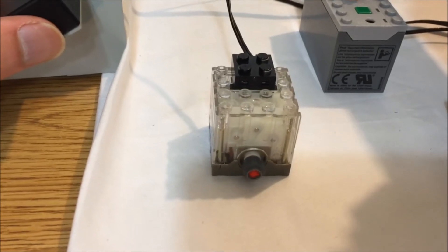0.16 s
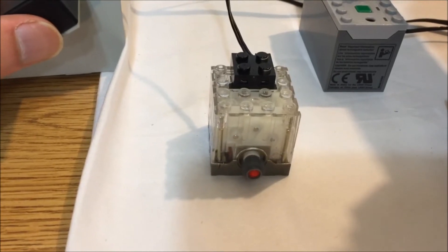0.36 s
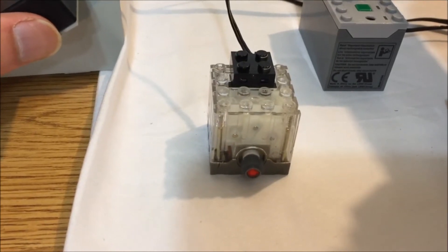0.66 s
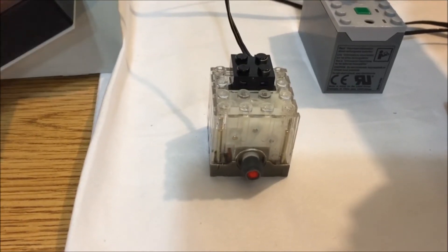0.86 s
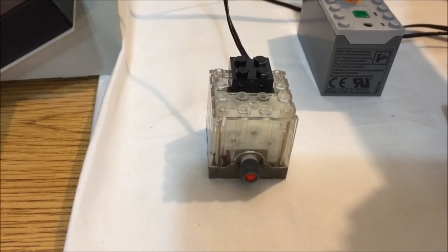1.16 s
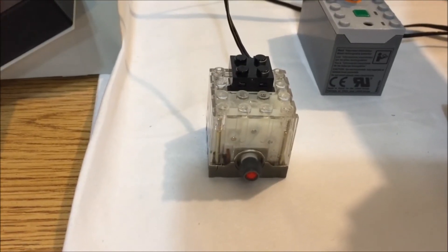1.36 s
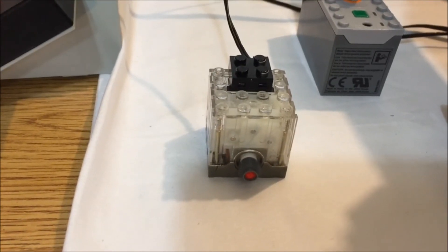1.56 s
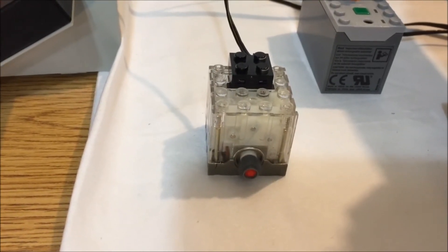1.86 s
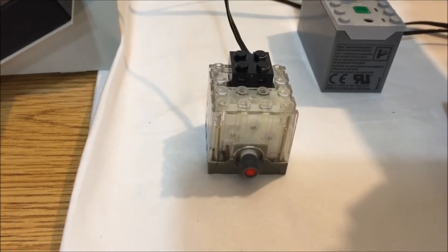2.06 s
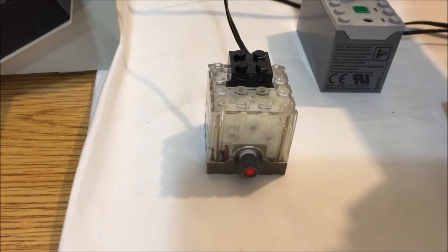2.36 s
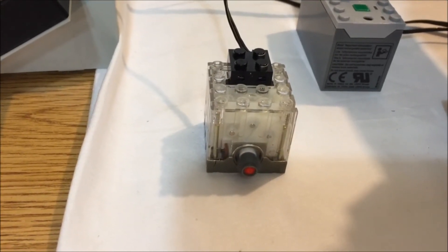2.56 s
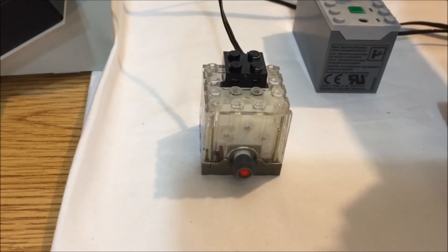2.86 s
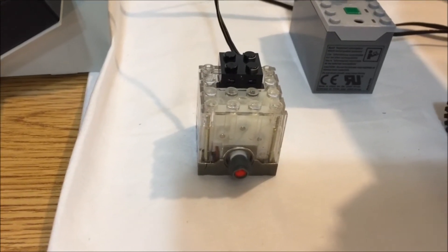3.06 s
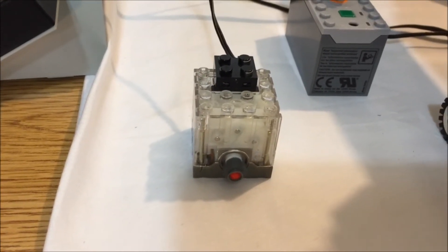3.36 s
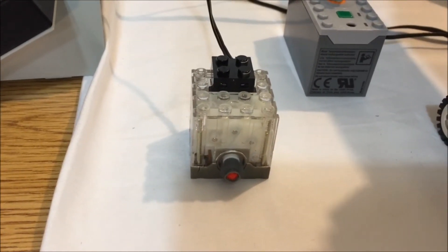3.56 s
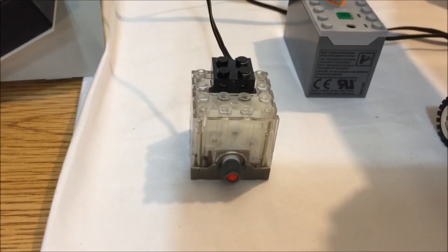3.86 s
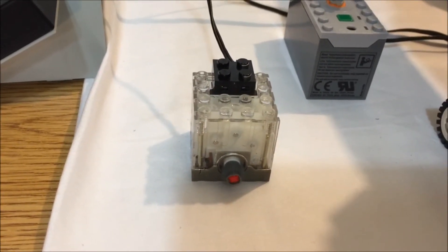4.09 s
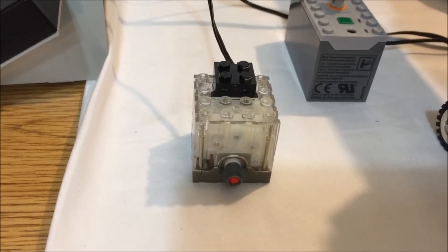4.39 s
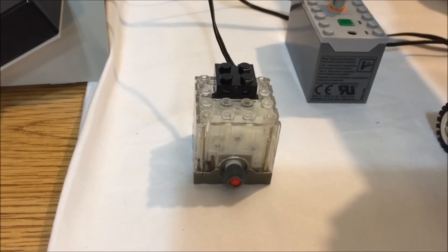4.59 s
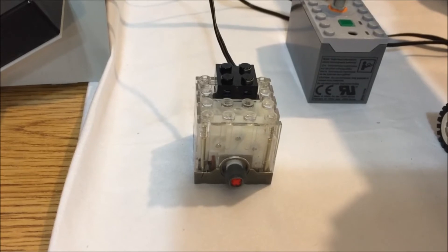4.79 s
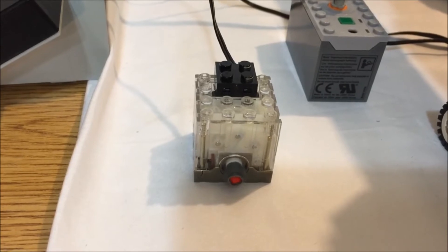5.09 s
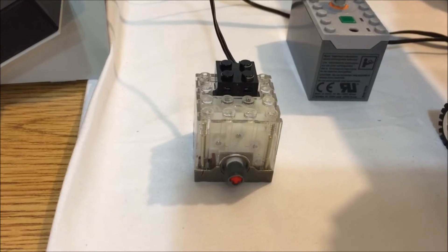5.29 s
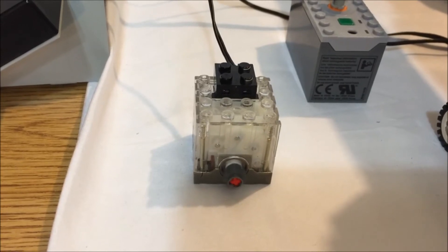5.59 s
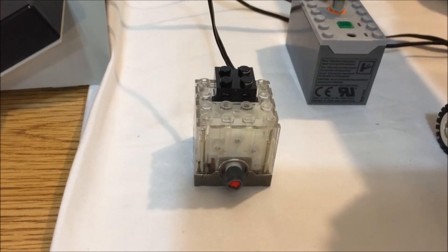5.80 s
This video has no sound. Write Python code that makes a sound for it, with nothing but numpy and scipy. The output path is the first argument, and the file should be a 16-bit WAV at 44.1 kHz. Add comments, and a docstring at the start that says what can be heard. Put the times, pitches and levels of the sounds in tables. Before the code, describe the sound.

A small geared electric motor buzzes steadily up close, rattles briefly on paper, then drops in pitch and loudness in steps.

```python
"""Geared toy motor on a papered table

Armature knocks, three a shaft turn, excite the modes of a plastic case and pass into the table top.
The case sits firmly, shakes loose with bouts of chatter on the paper, then settles; dial clicks slow the motor.
Gear teeth add shaped noise and the magnetic pull a tonal hum, both following the speed. Decaying
box modes make the dial's thuds; low noise makes the room's rumble, over faint still air."""
import sys
import numpy as np
from scipy import signal
from scipy.fft import rfft, irfft, next_fast_len
from scipy.io import wavfile
from scipy.ndimage import uniform_filter1d, map_coordinates

SR = 44100
rng = np.random.default_rng(int(sys.argv[2]) if len(sys.argv) > 2 else 0)


def transcribe(signal):
    """Save signal, clipped to [-1, 1], as a 16-bit WAV file at the path in sys.argv[1]."""
    frames = np.atleast_2d(signal).T
    limited = np.clip(frames, -1, 1)
    pcm = np.round(limited * 32767).astype(np.int16)
    wavfile.write(sys.argv[1], SR, pcm)


def ratio(d):
    """dB to gain"""
    e = np.asarray(d, float) / 20
    return 10 ** e


N = 261954  # samples

# dial settings: start_s, rate_knocks_per_s
DIAL_STEPS = [(0, 174.3), (3.002, 152.15), (3.96, 127.55), (5.2, 103.2), (5.504, 79.4)]
COAST_S = .066  # time constant of the armature slowing towards a new setting
# wavering of the top speed: time_s, offset_knocks_per_s
SPEED_WAVER = [(0, .1), (.85, -.37), (1.5, .4), (1.7, -.35), (2.05, 0), (2.3, 0), (2.6, .75), (3, .9),
               (3.3, 0)]
# how the case sits, first firm, then shaking, then settled: time_s, firm_0_to_1, shaking_0_to_1
CASE_SEAT = [(0, 1, 0), (1.64, 1, 0), (1.72, 0, .6), (2.3, 0, 1), (2.46, 0, 0)]
# level changes while firm and while shaking: knock_db, frame_ring_db, hardness_db, gear_hiss_db, hum_db
FIRM_CHANGES = (5, -0.06, -3.5, 0, -.4)
SHAKING_CHANGES = (-6, -4, 0.8, 1.5, 7.5)
# the same for the table modes: low_db, middle_db, upper_db
FIRM_TABLE_CHANGES = (-34, 5, -10)
SHAKING_TABLE_CHANGES = (-10, -2, 5.5)
FIRM_TIGHT, SHAKING_LOOSE = .4, 0.63  # share of looseness lost while firm; looseness added by shaking
FIRM_SHELL_DB = 2.5  # gain of the shell's upper mode while firm
FIRM_TOP_DB = 6.5  # gain of the top treble until the case has settled
EVEN_POLES = 0.29  # how far the poles even out before the case settles, 0-1

# knock strength by speed: rate_knocks_per_s, first_pole_relative_db, frame_ring_db, hardness_db
KNOCK_LEVELS = [(78, -51.5, 3.5, 1.5), (108, -50.5, 4.5, 5), (131.1, -40, 1, 1.5), (156.5, -36.5, -2.5, 1),
                (178, -35.5, -2, 0.5)]
# play and tooth noise by speed: rate_knocks_per_s, looseness_0_to_1, hiss_db
GEAR_PLAY = [(79, 0.31, -59), (103, .27, -56), (129, 0.2, -49.5), (153.5, 0.15, -44.5), (185, .13, -40.5)]
# the other poles against the first: rate_knocks_per_s, second_db, third_db, second_late_ms, third_late_ms
POLE_OFFSETS = [(107, -1, -2, 0, 0), (127.5, -4, -7.5, .04, .06), (152, -4, -8, .07, .16),
                (174.5, -2, -4.5, .05, .09)]
# tick ahead of each knock as the teeth take up their slack: rate_knocks_per_s, early_ms, relative_db
SLACK_TICKS = [(80, 3, -3), (104, 2.2, -5), (127.5, 1.4, -6), (152, 1.2, -6), (174.5, .6, -14)]
# longer skips, the teeth barely touching while the case is firm: start_s, length_s
TOOTH_SKIPS = [(.107, .012), (.165, .023), (.337, .017), (.595, .024), (.682, .023), (.9, .063),
               (1.078, .006), (1.279, .012), (1.348, .023), (1.416, .012), (1.571, .023)]
SKIP_SHARE, STRAY_SKIP_SHARE = .8, .09  # share of knocks missed inside these and otherwise, while firm
# case modes: centre_hz, width_hz, relative_db, delay_ms
CASE_MODES = [(1892, 166, -5.5, 0.098), (2070, 270, -1.5, 0.097), (2514, 283, 2.5, 0.0987),
              (3186, 384, -4, 0.109), (3476, 600, -5.5, 0.133), (4526, 590, -4, 1.104),
              (5310, 1760, -10, 1.112), (6660, 1650, -1, 0), (8970, 500, -9, 0), (10860, 1300, -16.5, 0.12),
              (13500, 450, -19, 0), (16500, 1400, -21, 0.1)]
# anti-resonances of the motor: centre_hz, width_hz, depth_0_to_1
ANTI_RESONANCES = [(904, 35, 1), (1846, 29, 0.34), (5400, 210, 0.75), (14200, 400, .6)]

# table-top modes: centre_hz, width_hz, chatter_per_looseness, pole_contrast_0_to_1
TABLE_MODES = [(820, 100, 0, .6), (1200, 330, .6, .2), (1560, 300, 1.1, .2)]
# what the table top takes up by speed: rate_knocks_per_s, low_db, middle_db, upper_db
TABLE_LEVELS = [(81, -77, -89, -70), (87, -68, -91, -64), (109.4, -68, -81, -68), (112, -63, -77, -64),
                (128, -67.5, -73.5, -59), (144, -68, -60, -57), (153.6, -66.5, -62.5, -63),
                (168, -76, -57.5, -60.5)]
# buzz in the lowest table mode: rate_knocks_per_s, share_0_to_1
TABLE_BUZZ = [(80, .15), (104, .04), (127.5, .5), (152, .93), (174.5, .3)]

# spectrum shape of the tooth hiss: frequency_hz, density_db_per_hz
HISS_SPECTRUM = [(700, -73), (1150, -27), (1450, -11), (1800, -8.5), (2500, -6), (3600, -4), (4700, -1.5),
                 (5400, -4), (6800, -5.5), (11000, -12.5), (15700, -21), (16000, -74)]
# spectrum shape of the lower gear noise: frequency_hz, density_db_per_hz
WHIRR_SPECTRUM = [(400, -38), (600, -18.5), (760, -32), (950, -10), (1300, -6.5), (1600, -30), (2000, -80)]
WHIRR_DB, WHIRR_DB_PER_OCTAVE = -19.5, 16  # against the hiss at top speed; falls with speed
# hum partials by speed: rate_knocks_per_s, fourth_multiple_db, fifth_multiple_db
HUM_LEVELS = [(104, -105, -100), (127.5, -94, -84), (145, -80, -100), (152, -76, -100), (174.5, -67, -100)]

# spectrum shape of the room rumble: frequency_hz, density_db_per_hz
RUMBLE_SPECTRUM = [(13, -43), (22, -21), (65, 1.5), (97, -9), (124, -0.5), (157, -10.5), (200, -19),
                   (300, -120)]
# underlying rumble level: time_s, level_db
RUMBLE_LEVEL = [(0, -72), (3, -74), (4.3, -73.5), (5.94, -77.5)]
# swells of the rumble: start_s, rise_db, dying_s
RUMBLE_SWELLS = [(.87, 22, 0.047), (1.25, 10.5, 0.26), (1.77, 24, 0.02), (3.25, 9.5, 0.17),
                 (3.76, 13, 0.053), (4.25, 14, 0.05), (5.8, 10, 0.051)]
# spectrum shape of still air: frequency_hz, density_db_per_hz
AIR_SPECTRUM = [(120, -60), (190, 0), (262, -1), (419, -10), (600, -11), (800, -40), (1000, -100)]
AIR_DB = -81

# fingertip thuds: start_s, relative_db, upper_modes_db
DIAL_THUDS = [(0.889, -41.5, 13), (0.999, -52.5, 2), (3.034, -66, 3), (3.183, -57.5, 0), (3.405, -50, 4),
              (3.492, -63, -2), (4.852, -66, 0), (5.148, -68, 3), (5.479, -65, 3), (5.853, -70, 0)]
# modes of the dial box: frequency_hz, relative_db, t60_s
DIAL_BOX_MODES = [(187, 4.5, 0.015), (333, 4.5, 0.022), (428, -3.5, 0.031), (703, 12.5, 0.0061),
                  (882, 0, 0.015), (1173, -4.5, 0.016), (1460, -5.5, 0.017)]

# bouts of chatter on the paper: start_s, length_s, level_db, shell_thump_db
RATTLE_BOUTS = [(1.685, 0.058, -57, 5.5), (1.833, 0.043, -53, 8), (1.957, 0.0067, -55, 4.5),
                (2.027, 0.0067, -64, 3.5), (2.117, 0.079, -51, 4.5), (2.24, 0.048, -58.5, 2.5)]
RATTLE_RISE_DB_PER_S, RATTLE_FALL_DB_PER_S, RATTLE_HARDENS_DB = 601, 358, 6
RATTLE_REST_DB = -62  # between bouts while the case shakes


def unit(x):
    """Normalisation: a signal is scaled to rms 1."""
    return x / np.sqrt(np.mean(x ** 2) + 1e-20)


def steady(x):
    """Level equalisation: division by the running rms removes slow drifts."""
    return x / np.sqrt(np.abs(uniform_filter1d(x ** 2, size=SR // 2)) + 1e-12)


def curves(rows):
    """Linear interpolation in time: each column after the first at every sample."""
    s, *cols = np.transpose(rows)
    return [np.interp(np.arange(N) / SR, s, c) for c in cols]


def by_speed(rows, speed):
    """Linear interpolation in speed: each column after the first at the given speeds."""
    key, *cols = np.transpose(rows)
    return np.array([np.interp(speed, key, c) for c in cols])


def filtered(x, response):
    """Linear filtering: the spectrum is multiplied by a complex frequency response."""
    m = next_fast_len(N + SR // 4)
    return irfft(rfft(x, m) * response(np.fft.rfftfreq(m, 1 / SR)), m)[:N]


def coloured(points):
    """Spectral shaping: white noise takes on the given spectrum at rms 1."""
    f, db = np.transpose(points)

    def response(hz):
        return ratio(np.interp(np.log(hz + 1), np.log(f + 1), db))
    return unit(filtered(rng.standard_normal(N), response))


def mode(f, hz, width):
    """Simple resonance: the causal response of one damped oscillator."""
    return 1j * f * width / (hz * hz - f * f + 1j * f * width)


def pulses(at, size):
    """Band-limited impulses: windowed sincs allow positions between samples."""
    taps = np.floor(at)[:, None] + np.arange(-7, 9)
    offset = taps - at[:, None]
    shape = np.sinc(offset) * np.cos(np.pi * offset / 16) ** 2
    places = np.clip(taps, 0, N - 1).astype(int)
    return np.bincount(places.ravel(), (size[:, None] * shape).ravel(), N)


def clicks(at, size, share, chatter_s):
    """Impact excitation: clean clicks give a share of their energy to a short chatter of teeth."""
    t = np.arange(SR // 100) / SR
    burst = (1 - np.exp(-t / .0001)) * np.exp(-t / chatter_s)
    burst /= np.linalg.norm(burst)
    gate = signal.fftconvolve(pulses(at, size * np.sqrt(share)), burst)[:N]
    return pulses(at, size * np.sqrt(1 - share)) + gate * rng.standard_normal(N)


def armature():
    """Rotational inertia: after each dial click the knock rate coasts exponentially to its setting."""
    t = np.arange(N) / SR
    speed = DIAL_STEPS[0][1] + curves(SPEED_WAVER)[0]
    for (_, old), (s, new) in zip(DIAL_STEPS, DIAL_STEPS[1:]):
        speed += (new - old) * (1 - np.exp(-np.maximum(t - s, 0) / COAST_S))
    return speed


def seated(firm_db, shaking_db):
    """Contact coupling: level changes follow how the case sits."""
    firm, shaking = curves(CASE_SEAT)
    return np.outer(firm_db, firm) + np.outer(shaking_db, shaking)


def bouts():
    """Intermittent contact: chatter gain, bout strength 0-1 and shell thump in dB."""
    t = np.arange(N) / SR
    under_db = []
    for s, length, _, _ in RATTLE_BOUTS:
        before_db = RATTLE_RISE_DB_PER_S * np.maximum(s - t, 0)
        after_db = RATTLE_FALL_DB_PER_S * np.maximum(t - s - length, 0)
        under_db.append(before_db + after_db)
    strength = ratio(-np.array(under_db))
    _, _, db, thump_db = np.transpose(RATTLE_BOUTS)
    rest = ratio(RATTLE_REST_DB) * np.minimum(2 * curves(CASE_SEAT)[1], 1)
    return ratio(db) @ strength + rest, strength.max(axis=0), thump_db @ strength


def knock_train(phase, speed, jitter_s):
    """Periodic impact: three poles a shaft turn, shifted by the play in the bearings."""
    count = np.arange(1, int(phase[-1]) + 1)
    even = np.interp(count, phase, np.arange(N))  # sample positions before shifting
    i, pole = even.astype(int), count % 3
    firm, shaking = [c[i] for c in curves(CASE_SEAT)]
    unmoved = np.clip(firm + 2 * shaking, 0, 1)
    draw = rng.standard_normal((len(count), 3 + len(CASE_MODES)))

    loose = by_speed(GEAR_PLAY, speed[i])[0] * (1 - FIRM_TIGHT * firm) + SHAKING_LOOSE * shaking
    loose = np.clip(loose * np.array([.5, 1.2, 1.6])[pole], 0, 1)  # the first pole seats firmly

    offsets = by_speed(POLE_OFFSETS, speed[i]) * (1 - EVEN_POLES * unmoved)
    second_db, third_db, second_ms, third_ms = offsets
    pole_db = np.choose(pole, [0 * i, second_db, third_db])
    late_ms = np.choose(pole, [0 * i, second_ms, third_ms])
    at = even + late_ms * SR / 1000 + jitter_s * SR * loose * draw[:, 1]

    skipping = sum((even > s * SR) & (even < (s + length) * SR) for s, length in TOOTH_SKIPS)
    chance = firm * np.where(skipping, SKIP_SHARE, STRAY_SKIP_SHARE)
    missed = rng.random(len(count)) < chance  # the teeth barely touch
    return dict(even=even, at=at, i=i, speed=speed[i], firm=firm, unmoved=unmoved,
                loose=loose, pole_db=pole_db, missed=missed, draw=draw)


def case_ring(train, scatter_db, colour_db, miss_db):
    """Modal excitation: each knock and its early slack tick ring the modes of the plastic case."""
    at, i, speed, loose, draw = [train[key] for key in ("at", "i", "speed", "loose", "draw")]
    _, bout, thump_db = [c[i] for c in bouts()]
    seat_db = seated(FIRM_CHANGES, SHAKING_CHANGES)[:3, i]
    first_db, frame_db, hard_db = by_speed(KNOCK_LEVELS, speed) + seat_db
    first_db += thump_db
    frame_db += RATTLE_HARDENS_DB * bout - thump_db
    hard_db += RATTLE_HARDENS_DB * bout - thump_db
    lead_ms, lead_db = by_speed(SLACK_TICKS, speed)
    slow_octaves = np.log2(speed / 174)
    drift = map_coordinates(rng.standard_normal(100), [at / SR * 14])
    case = np.zeros(N)
    for k, (hz, width, db, delay_ms) in enumerate(CASE_MODES):
        part = int(hz > 3400) + int(hz > 5500)  # shell, gear frame, hard treble
        level_db = first_db + [0, frame_db, hard_db][part] + db + 21.5
        level_db += [1.25, .5, .9][part] * train["pole_db"]
        level_db += [1.1, .6, .6][part] * miss_db * train["missed"]
        scatter = scatter_db * draw[:, 0] + colour_db * draw[:, 3 + k]
        level_db += scatter * np.clip(.3 + loose, 0, .8) * [.9, .7, .6][part]
        level_db += FIRM_SHELL_DB * train["firm"] * (3000 < hz < 3400)
        level_db += 0.4 * drift  # the gears bind and free up as they turn
        top_db = 5 * slow_octaves + FIRM_TOP_DB * train["unmoved"]
        level_db += top_db * (hz > 10000)  # slower blows are duller

        share = loose ** ((2500 / hz) ** 0.94)  # higher modes are driven more by chatter
        knock_at = at + delay_ms * SR / 1000
        drive = clicks(knock_at, ratio(level_db), share, chatter_s=[.0004, .0011, .0005][part])
        if part:
            tick_db = level_db + lead_db - [0, 0, 8][part]
            drive += clicks(at - lead_ms * SR / 1000, ratio(tick_db), .5, chatter_s=.0004)
        scale = (-1) ** k / np.sqrt(np.pi * width / SR)
        case += filtered(drive, lambda f: scale * mode(f, hz, width))
    return filtered(case, lambda f: (1j * f / (1500 + 1j * f)) ** 4)  # a small shell radiates no bass


def table_ring(train, speed, miss_db):
    """Structure-borne sound: the magnetic push, in even time, drives the table-top modes."""
    table_db = by_speed(TABLE_LEVELS, speed) + seated(FIRM_TABLE_CHANGES, SHAKING_TABLE_CHANGES)
    out = np.zeros(N)
    for k, (hz, width, chatter, contrast) in enumerate(TABLE_MODES):
        push_db = contrast * train["pole_db"] + .5 * miss_db * train["missed"] + train["draw"][:, 2]
        share = np.minimum(chatter * train["loose"], 1)
        if k == 0:
            share = share + by_speed(TABLE_BUZZ, train["speed"])[0]
        push = clicks(train["even"], ratio(push_db), share, chatter_s=.0015)

        def response(f):
            gap = (1 - mode(f, 890, 130)) ** (2 * (k > 0))  # upper modes cancel just above the lowest
            return mode(f, hz, width) ** 2 * gap
        out += ratio(table_db[k]) * (-1) ** k * steady(filtered(push, response))
    return out


def gears(phase, speed, db):
    """Friction noise: the teeth hiss and whirr all the time, the hiss swelling once a knock."""
    swell = 1 + 0.2 * np.cos(2 * np.pi * (phase - .2))
    hiss = unit(swell * coloured(HISS_SPECTRUM))
    whirr_db = WHIRR_DB + WHIRR_DB_PER_OCTAVE * np.log2(speed / DIAL_STEPS[0][1])
    return ratio(db) * (hiss + ratio(whirr_db) * coloured(WHIRR_SPECTRUM))


def hum(phase, fourth_db, fifth_db):
    """Magnetic force: the pull sings on the fourth and fifth multiples of the knock rate."""
    fourth = ratio(fourth_db) * np.sin(2 * np.pi * 4 * phase)
    fifth = ratio(fifth_db) * np.sin(2 * np.pi * 5 * phase)
    return np.sqrt(2) * (fourth + fifth)  # levels are rms


def room():
    """Ambient noise: an uneven low rumble swells now and then, over still air."""
    t = np.arange(N) / SR
    level_db = curves(RUMBLE_LEVEL)[0]
    for s, db, dying in RUMBLE_SWELLS:
        level_db += db * np.clip((t - s) / 0.01, 0, 1) * np.exp(-np.maximum(t - s, 0) / dying)
    level_db += 2 * map_coordinates(rng.standard_normal(60), [t * 8])  # uneven level
    return ratio(level_db) * coloured(RUMBLE_SPECTRUM) + ratio(AIR_DB) * coloured(AIR_SPECTRUM)


def dial():
    """Damped free vibration: a soft fingertip on the dial thuds the box it sits in."""
    out, t = np.zeros(N + SR), np.arange(SR // 8) / SR
    onset = (1 - np.exp(-t / 0.006)) ** 2
    for s, db, upper_db in DIAL_THUDS:
        ring = np.zeros(len(t))
        for hz, level, t60 in DIAL_BOX_MODES:
            mode_db = level + upper_db * (hz > 600) + rng.normal(0, 1.5) - 60 * t / t60
            ring += ratio(mode_db) * np.sin(2 * np.pi * (hz * t + rng.random()))
        out[round(s * SR):][:len(t)] += ratio(db + 18.5) * ring * onset
    return out[:N]


def paper_rattle(train):
    """Repeated contact: the case chatters on the paper and shakes the gear frame too."""
    at, draw = train["at"], train["draw"]
    slap = clicks(at, ratio(4.2 * draw[:, 2]), 0.12, chatter_s=0.011)
    shake = clicks(at, ratio(2 * draw[:, 0]), 1.0, chatter_s=0.0017)
    paper = unit(filtered(slap, lambda f: mode(f, 1135, 690) ** 2))
    frame = unit(filtered(shake, lambda f: mode(f, 4660, 970) ** 2))
    return bouts()[0] * (paper + ratio(9) * frame)


def scene():
    """Superposition: motor, table, dial and room add, heard from close by."""
    speed = armature()
    phase = np.cumsum(speed) / SR - .145  # in knocks
    hiss_change_db, hum_change_db = seated(FIRM_CHANGES, SHAKING_CHANGES)[3:]
    hiss_db = by_speed(GEAR_PLAY, speed)[1] + hiss_change_db
    fourth_db, fifth_db = by_speed(HUM_LEVELS, speed)

    train = knock_train(phase, speed, jitter_s=.00008)  # at full looseness
    miss_db = -12  # nominal, weighted by each part
    motor = case_ring(train, scatter_db=2, colour_db=2.2, miss_db=miss_db)
    motor += table_ring(train, speed, miss_db)
    motor += gears(phase, speed, hiss_db)

    def notches(f):
        return np.prod([1 - np.clip(depth, 0, 1) * mode(f, hz, width)
                        for hz, width, depth in ANTI_RESONANCES], axis=0)
    motor = filtered(motor, notches)
    mix = motor + hum(phase, fourth_db + hum_change_db, fifth_db) + room() + dial() + paper_rattle(train)
    return mix[None]


def band_limit(x):
    """A steep low-pass at the top of the band."""
    return signal.sosfilt(signal.butter(12, 15760, fs=SR, output="sos"), x)


def record(dry):
    """Signal chain: the finished mix passes to the last stage."""
    return band_limit(dry)


dry = scene()
out = record(dry)
transcribe(out)
```